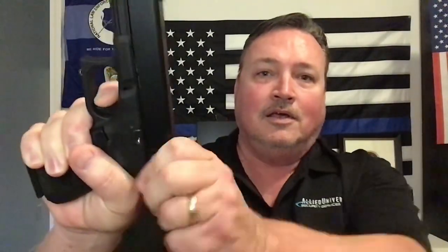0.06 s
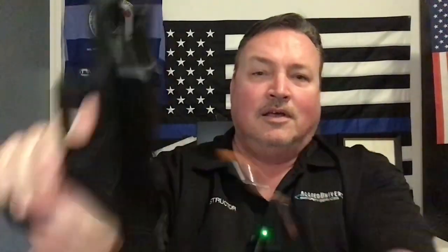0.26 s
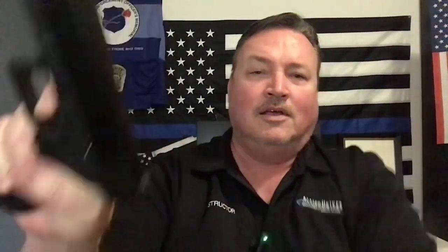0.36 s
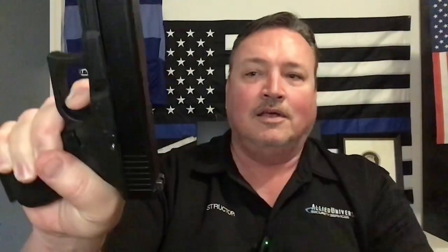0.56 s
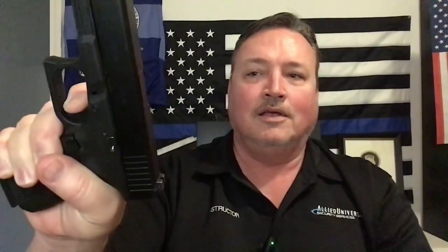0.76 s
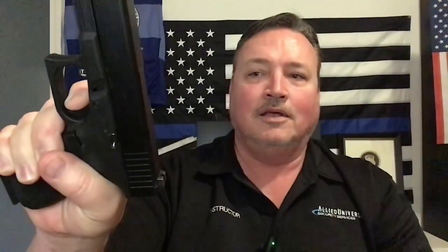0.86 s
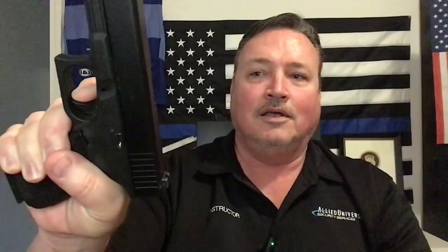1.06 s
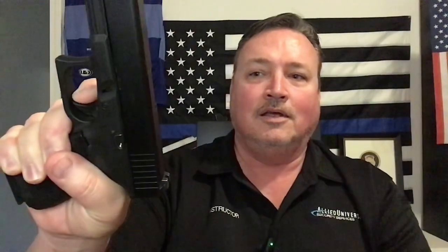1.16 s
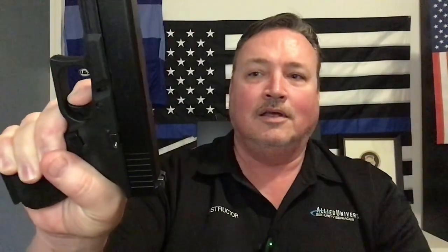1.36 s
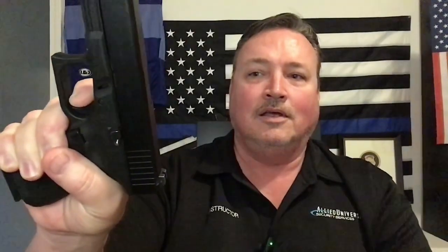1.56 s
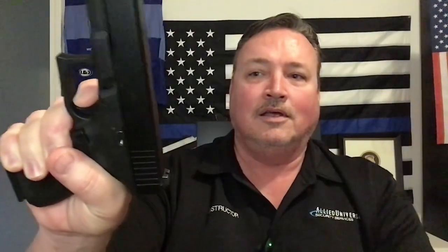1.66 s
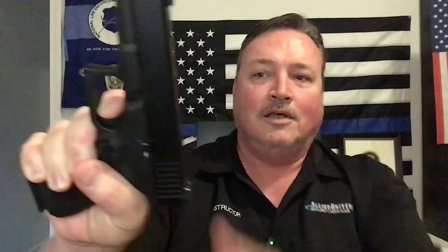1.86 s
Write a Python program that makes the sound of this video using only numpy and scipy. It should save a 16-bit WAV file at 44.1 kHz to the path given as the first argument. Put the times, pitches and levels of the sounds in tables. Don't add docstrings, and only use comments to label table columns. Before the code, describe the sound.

Close, harsh steel scrape and double clack of a pistol slide, then a dull knock on floorboards with low rumble, a light reset tick and a dry striker snap, in a quiet small room through a laptop microphone.

```python
import sys
import numpy as np
from scipy import signal
from scipy.fft import rfft, irfft
from scipy.io import wavfile
from scipy.ndimage import uniform_filter1d, minimum_filter1d

SR = 44100
rng = np.random.default_rng(int(sys.argv[2]) if len(sys.argv) > 2 else 0)


def volts_from_decibels(level):
    exponent = np.asarray(level, float) / 20
    return 10 ** exponent


def output_pcm(signal):
    pcm = np.clip(np.atleast_2d(signal).T, -1, 1) * 32767
    wavfile.write(sys.argv[1], SR, np.round(pcm).astype(np.int16))


N = 83790
T = np.arange(N) / SR


def band(x, hz, width):
    r = np.exp(-np.pi * width / SR)
    angle = 2 * np.pi * min(hz, .45 * SR) / SR
    return signal.lfilter([1 - r, 0, r - 1], [1, -2 * r * np.cos(angle), r * r], x)


def fade(t, t60):
    return (t >= 0) * np.exp(-np.log(1000) * np.clip(t, 0, None) / t60)


def air():
    # (frequency [Hz], level [dB per Hz])
    spectrum = np.array([(18, -42.5), (30, -25), (239, -6), (319, -22), (364, -13), (540, -25),
                         (780, -15.5), (844, -23.5), (16000, -33.5)])
    level_db = -68
    hz = np.maximum(np.fft.rfftfreq(N, 1 / SR), 1)
    gain_db = np.interp(np.log(hz), np.log(spectrum[:, 0]), spectrum[:, 1])
    tone = irfft(rfft(rng.standard_normal(N)) * volts_from_decibels(gain_db), N)
    return tone * volts_from_decibels(level_db) / np.std(tone)


def room(x):
    # (frequency [Hz], t60 [s], level [dB])
    absorption = np.array([(100, 0.36, -34.5), (304, 0.24, -39), (750, 0.59, -44.5), (2000, 0.4, -39.5),
                           (4500, 0.47, -39.5), (9000, 0.39, -42.5), (14000, 0.25, -38)])
    # (delay [s], level [dB])
    echoes = [(.0068, -16), (.0089, -15.5), (.019, -27.5)]
    onset_s = .005
    t = T[:int(.8 * SR)]
    log_hz = np.log(absorption[:, 0])
    tail = 0
    for hz in 90 * 2 ** np.arange(0, 7.6, .5):
        t60 = np.interp(np.log(hz), log_hz, absorption[:, 1])
        db = np.interp(np.log(hz), log_hz, absorption[:, 2])
        noise = band(band(rng.standard_normal(len(t)), hz, hz / 2), hz, hz / 2)
        tail = tail + volts_from_decibels(db) * fade(t, t60) * noise
    tail = tail * np.clip(t / onset_s - 1, 0, 1)
    for delay, db in echoes:
        tail[int(delay * SR)] += volts_from_decibels(db)
    return signal.fftconvolve(x, tail)[:N]


def floor_boards():
    starts = [.697, .697, .700, 1.096, 1.100]
    # (rms level [dB], centre [Hz], t60
    # [s])
    rumbles = [
        (-34, 340, 0.24),
        (-49.5, 740, 0.17),
        (-44.5, 136, 0.44),
        (-57, 220, 0.18),
        (-52.5, 110, 0.36),
    ]
    out = 0
    for s, (db, hz, t60) in zip(starts, rumbles):
        rumble = band(band(rng.standard_normal(N), hz, hz), hz, hz)
        attack = np.clip((T - s) * hz, 0, 1)
        out = out + volts_from_decibels(db) * fade(T - s, t60) * attack * rumble / np.std(rumble)
    return out


def dummy_round():
    starts = [.6915, .6915, .6912, .7052]
    # (peak level [dB], frequency [Hz], t60 [s])
    knocks = [
        (-19.5, 330, 0.019),
        (-34, 610, 0.014),
        (-27, 1500, 0.0051),
        (-39, 258, 0.015),
    ]
    out = 0
    for s, (db, hz, t60) in zip(starts, knocks):
        t = T - s
        attack = np.clip(t * hz * 2, 0, 1)
        out = out + volts_from_decibels(db) * fade(t, t60) * attack * np.sin(2 * np.pi * hz * t)
    return out


def jolts():
    starts = [.2463, .3122, .3128, 1.4165]
    # (peak level [dB], start frequency [Hz], end frequency [Hz], t60 [s])
    swings = [
        (-8.5, 470, 53, 0.097),
        (0.5, 820, 580, 0.023),
        (-4, 390, 94, 0.043),
        (-16.5, 546, 63.6, 0.086),
    ]
    glide_s = 0.0044
    out = 0
    for s, (db, start_hz, end_hz, t60) in zip(starts, swings):
        t = np.clip(T - s, 0, None)
        turns = end_hz * t + (start_hz - end_hz) * glide_s * (1 - np.exp(-t / glide_s))
        out = out - volts_from_decibels(db) * fade(T - s, t60) * np.sin(2 * np.pi * turns)
    return out


def contact_burst(contact_ms, bright_hz):
    low_hz, attack_s = 1302, 0.000281
    t = np.arange(1024) / SR
    f = np.fft.rfftfreq(len(t), 1 / SR)
    shape = np.clip(t / attack_s, 0, 1) * np.exp(-t * 1000 / contact_ms)
    grain = rfft(rng.standard_normal(len(t)) * shape)
    colour = f ** 4 / (f ** 4 + low_hz ** 4)
    colour = colour * (.5 + 1 / (1 + ((f - bright_hz) / (1.2 * bright_hz)) ** 2))
    burst = irfft(colour * grain / np.abs(grain)) * shape ** .5
    return burst / np.max(np.abs(burst))


def ringing_body(modes):
    wobble = 0.7
    t = T[:SR // 2]
    body = 0
    for hz, db, t60 in modes:
        wander = wobble * np.cumsum(rng.standard_normal(len(t))) / 20
        body = body + volts_from_decibels(db) * fade(t, t60) * np.sin(2 * np.pi * hz * t + wander)
    return body - np.mean(body[:300]) * (t < 300 / SR)


def steel(hits, modes):
    crack, taps = np.zeros(N), np.zeros(N)
    for s, db, contact_ms, bright_hz in hits:
        burst = contact_burst(contact_ms, bright_hz)
        i = int(s * SR)
        crack[i:i + len(burst)] += volts_from_decibels(db) * burst
        taps[i + 8] = volts_from_decibels(db)
    return crack + signal.fftconvolve(taps, ringing_body(modes))[:N]


def trigger_reset():
    # (time [s], peak level [dB], contact [ms], bright centre [Hz])
    hits = [
        (1.019, -50.5, 2.4, 3050),
        (1.047, -46, 1.2, 2497),
        (1.054, -73, 0.86, 12170),
        (1.066, -76, 1.3, 6000),
        (1.0772, -8.5, 0.43, 8640),
    ]
    # (frequency [Hz], level [dB], t60 [s])
    modes = [(1864, -26.5, 0.026), (3317, -10.5, 0.0078), (4740, -8, .01), (12990, -32, 0.013)]
    return steel(hits, modes)


def striker_fall():
    # (time [s], peak level [dB], contact [ms], bright centre [Hz])
    hits = [(1.3828, -44, 1.8, 2500), (1.3900, -60, .8, 5000), (1.3922, -43, 0.27, 10000),
            (1.3978, -49, 0.68, 10000), (1.4030, -46, 2.3, 4000), (1.4090, -36, 0.83, 4000),
            (1.4133, 0, 1.9, 5000), (1.4153, 2.5, 0.87, 9000), (1.4178, -8.5, 1.3, 9000),
            (1.4205, 2, 1.3, 10260), (1.4250, -2.5, 1.2, 7580), (1.4296, -9.5, 1.9, 10250),
            (1.4345, -10.5, 0.53, 10680), (1.4438, -12, 1.4, 10000)]
    # (frequency [Hz], level [dB], t60 [s])
    modes = [(2740, -28.5, 0.064), (2926, -25, 0.035), (3556, -26, 0.016), (6500, -43, 0.034),
             (9000, -15.5, 0.12), (9700, -29.5, 0.023), (9844, -14.5, 0.013), (10300, -24.5, 0.03),
             (9680, -23, .008)]
    return steel(hits, modes)


def slide_pulled():
    # (time [s], peak level [dB], contact [ms], bright centre [Hz])
    hits = [(.1700, -33.5, 1.3, 5000), (.1775, -13.5, 1.4, 6860), (.1805, -6.5, 1.4, 4500),
            (.1895, -23.5, 1.6, 4630), (.2050, -5.5, 1.1, 6000), (.2140, -28, 2.5, 8000),
            (.2190, -23, 1.6, 3000), (.2303, -7, 1.3, 7000), (.2326, -7.5, 2.2, 6000),
            (.2358, -4.5, 2.2, 8000), (.2441, -2.5, 1.1, 7950), (.2455, 8.5, 1.3, 3720)]
    # (frequency [Hz], level [dB], t60 [s])
    scrape_modes = [(1904, -18.5, 0.023), (4200, -12, 0.012), (9440, -22.5, .02)]
    # (frequency [Hz], level [dB], t60 [s])
    open_modes = [(1850, -15.5, 0.056), (3080, -22.5, .02), (4310, -36, 0.28), (7250, -27, 0.034),
                  (9000, -37, .1), (9350, -19.5, 0.04), (9180, -24.5, .1), (13500, -30.5, 0.38),
                  (14200, -23.5, .012)]
    gripped_s = 0.26
    damping = np.where(T < gripped_s, 1, fade(T - gripped_s, .02))
    return steel(hits[:-2], scrape_modes) + steel(hits[-2:], open_modes) * damping


def slide_shut():
    # (time [s], peak level [dB], contact [ms], bright centre [Hz])
    hits = [(.2938, -5, 1.3, 7490), (.2955, 1, 1.2, 3900), (.300, -16.5, 3.6, 4830), (.3032, 14, 3.6, 8040),
            (.3058, 16.5, 0.53, 7000), (.3095, 13.5, 0.6, 6500), (.3132, 10, 3.8, 9000),
            (.3185, 7, 0.83, 8070), (.3225, -5.5, 3, 6000), (.329, -1.5, 3, 8000), (.3325, 0.5, 3, 8000),
            (.338, -5.5, 1.3, 8000)]
    # (frequency [Hz], level [dB], t60 [s])
    modes = [(1930, -39.5, .05), (2216, -17.5, 0.017), (2823, -36.5, 0.11), (4320, -34, 0.11),
             (4385, -27.5, 0.31), (4556, -34.5, 0.15), (6850, -26.5, 0.017), (8070, -28.5, 0.055),
             (9000, -33, .03), (9300, -34.5, 0.093), (10400, -30.5, 0.14), (14400, -25, 0.027)]
    return steel(hits, modes)


def scene():
    floor = dummy_round() + floor_boards()
    frame = jolts()
    pistol = slide_pulled() + slide_shut() + trigger_reset() + striker_fall()
    wet = room(pistol + volts_from_decibels(-2) * floor + volts_from_decibels(-25) * frame)
    return (pistol + frame + floor + wet + air())[None]


def low_pass(x):
    return signal.sosfilt(signal.butter(12, 16560, fs=SR, output="sos"), x)


def record(dry):
    low_cut_hz, top_hz = 45, 15600
    above_db, share = -22.5, 0.4
    attack_s, hold_s, release_s = .03, 0.1, 0.061
    x = signal.sosfilt(signal.butter(2, low_cut_hz, "high", fs=SR, output="sos"), dry[0])
    keep = np.exp(-1 / (attack_s * SR))
    power = signal.lfilter([1 - keep], [1, -keep], x ** 2)
    over_db = np.maximum(10 * np.log10(power + 1e-12) - above_db, 0)
    hold, release = int(hold_s * SR) | 1, int(release_s * SR) | 1
    held = -minimum_filter1d(-over_db, hold, origin=hold // 2)
    duck_db = np.maximum(held, uniform_filter1d(held, release, origin=release // 2))
    x = np.tanh(x * volts_from_decibels(-share * duck_db))
    x = signal.sosfilt(signal.butter(8, top_hz, fs=SR, output="sos"), x)
    return low_pass(x[None])


dry = scene()
out = record(dry)
output_pcm(out)
```